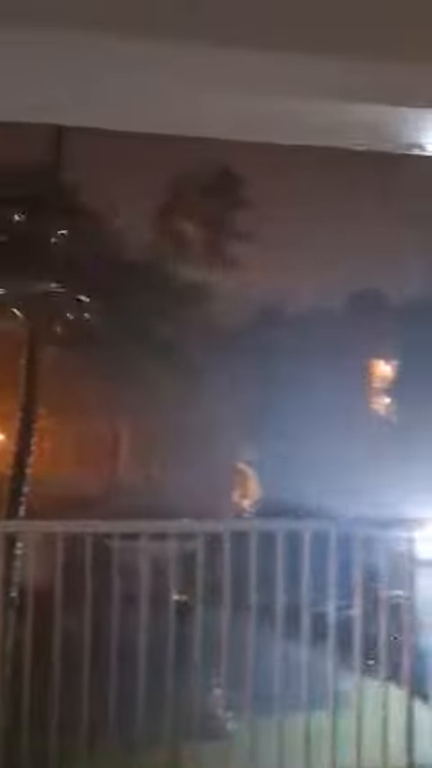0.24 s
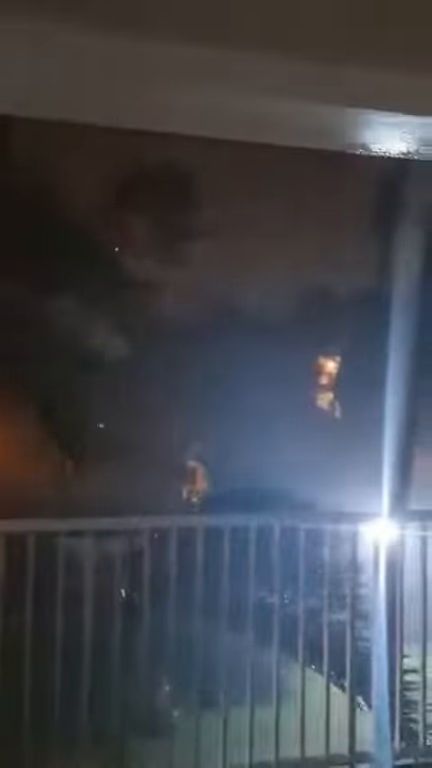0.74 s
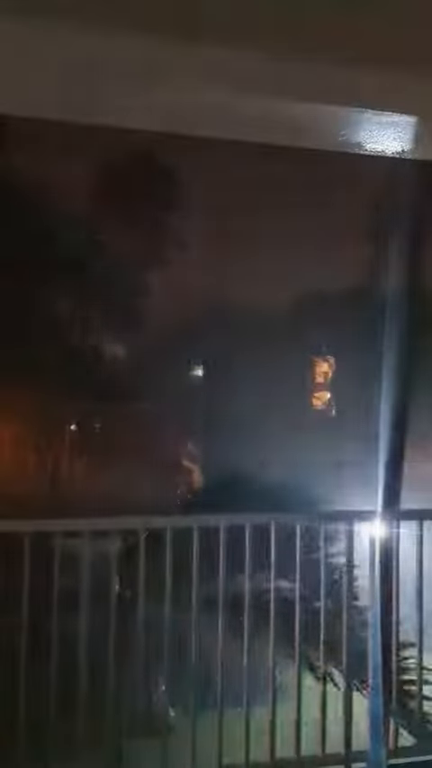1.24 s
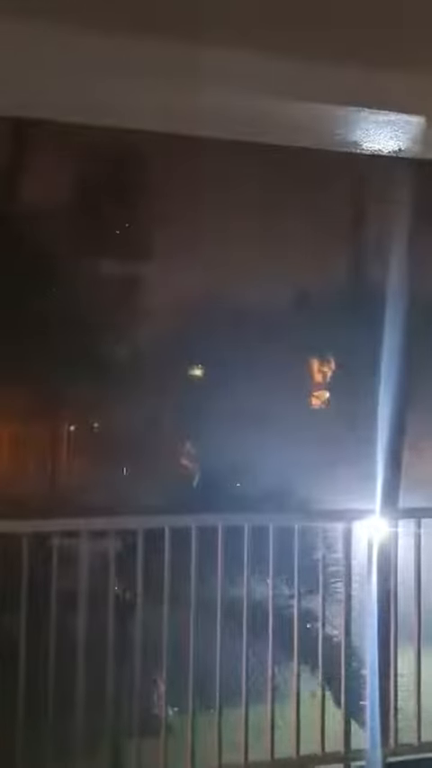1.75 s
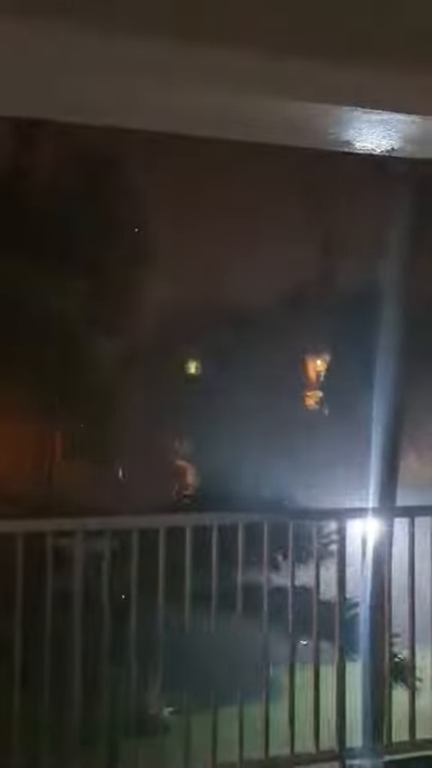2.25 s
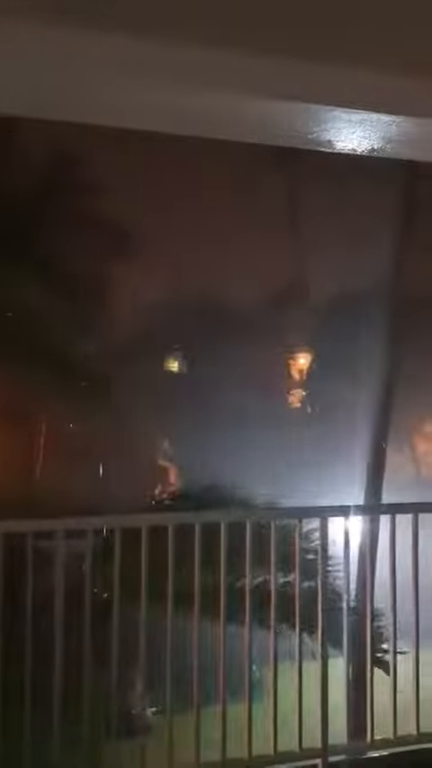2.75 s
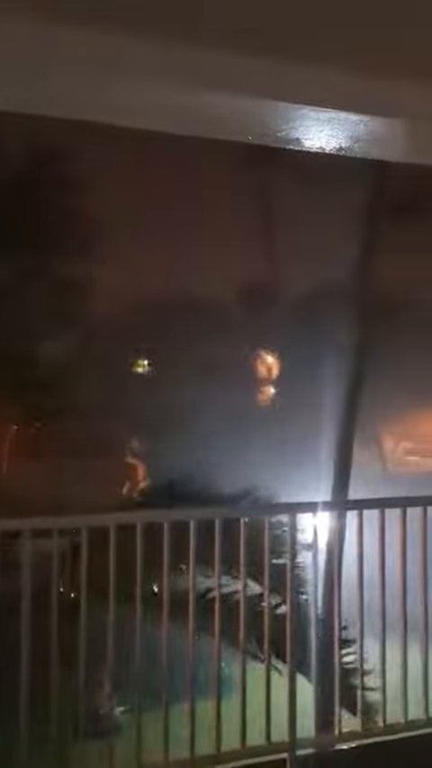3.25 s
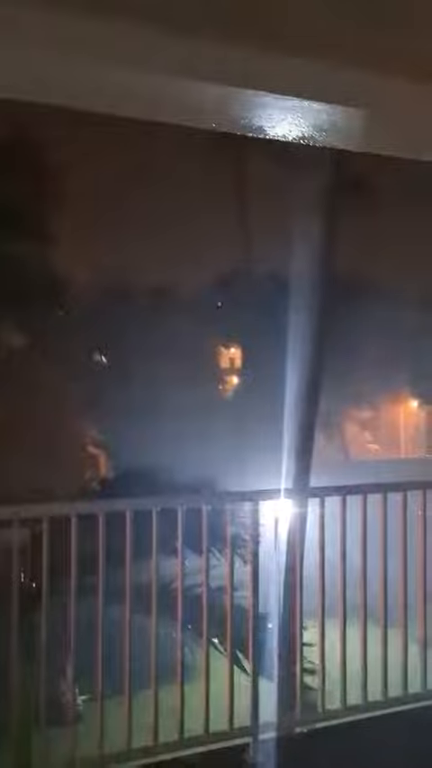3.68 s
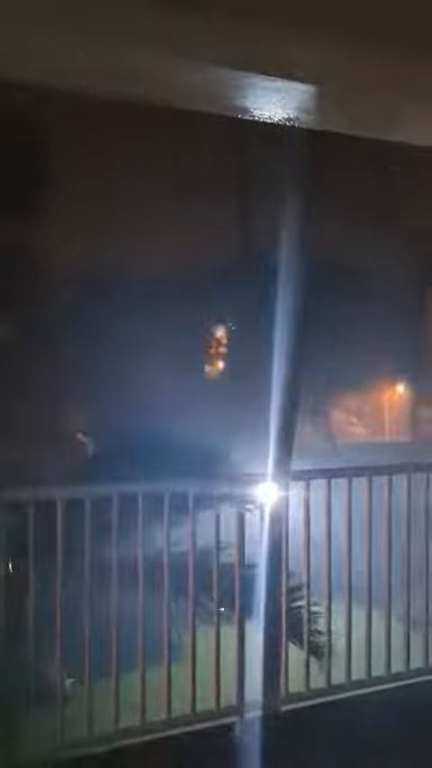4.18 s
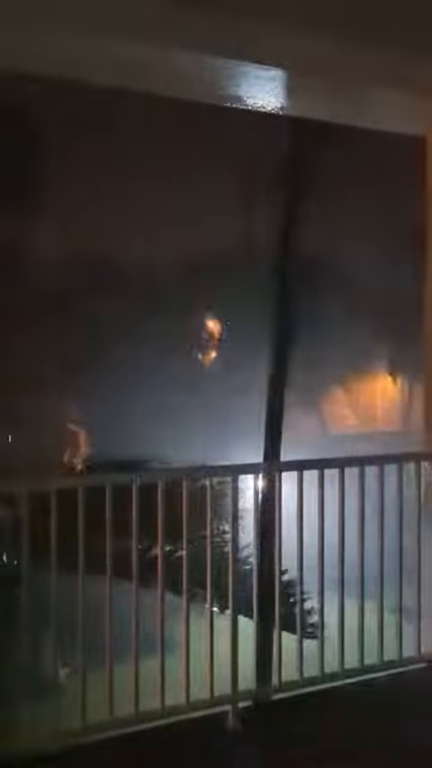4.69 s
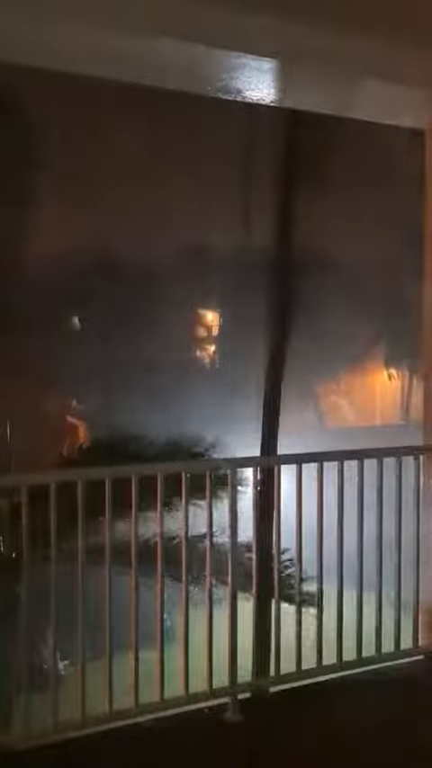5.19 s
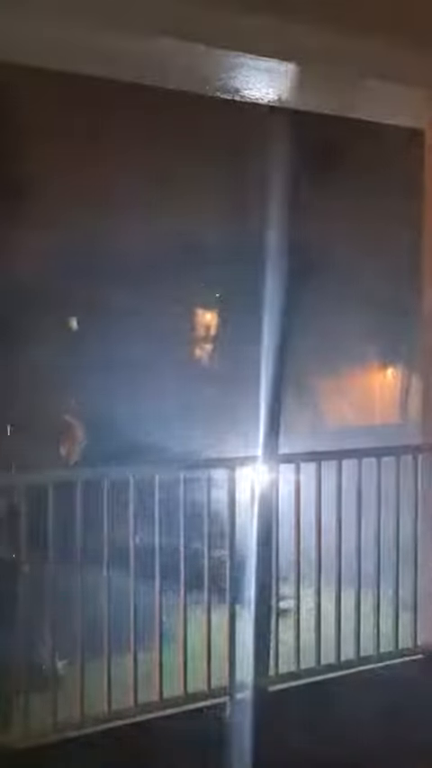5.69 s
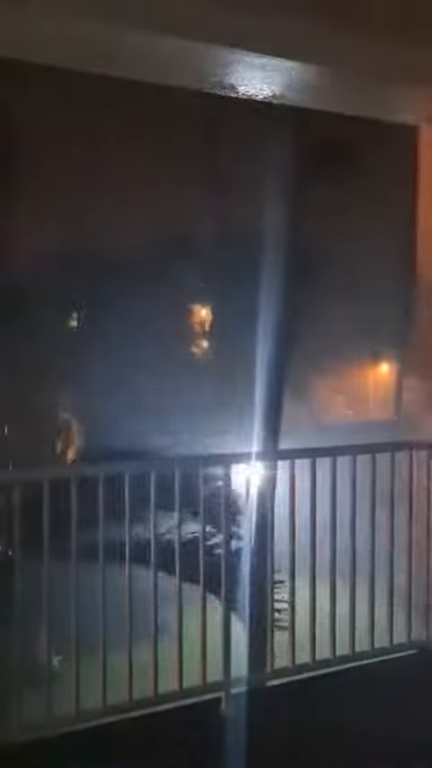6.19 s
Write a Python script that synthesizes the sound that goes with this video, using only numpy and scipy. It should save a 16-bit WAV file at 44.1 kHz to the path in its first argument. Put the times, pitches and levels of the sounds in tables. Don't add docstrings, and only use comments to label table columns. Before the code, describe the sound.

Driving rain roars and hisses outside at night while gusting wind thumps, flaps and slaps hard against a hand-held phone's microphone.

```python
import sys
import numpy as np
from scipy import signal
from scipy.fft import rfft, irfft, next_fast_len
from scipy.io import wavfile
from scipy.ndimage import uniform_filter1d

SR = 44100
rng = np.random.default_rng(int(sys.argv[2]) if len(sys.argv) > 2 else 0)


def generate_wav(sig):
    pcm = np.round(np.clip(np.atleast_2d(sig).T, -1, 1) * 32767).astype(np.int16)
    wavfile.write(sys.argv[1], SR, pcm)


def attenuation_scalar(level_db):
    decades = np.asarray(level_db, float) / 20
    return 10 ** decades


N = 283563
SIZE = next_fast_len(N)
HZ = np.maximum(np.arange(SIZE // 2 + 1) * SR / SIZE, 1)
RELEASE_STRETCH = 1.13

# (time [s], level [dB], left-right difference [dB])
WIND = [(0, -30, 4), (0.2, -37, 4), (0.45, -41.5, -4), (0.85, -47.5, -11), (1.2, -39, 18),
        (1.78, -34.5, 11), (2.02, -36, 2), (2.3, -34, -12), (2.75, -23.5, -5), (3.0, -43, 13),
        (3.65, -28, -2), (4.02, -43, -6), (4.3, -31, -0.2), (4.7, -38, 4), (5.18, -27, -3), (5.36, -27, 1),
        (5.75, -24.5, -6), (6.43, -28.5, 4)]


def rms_one(x):
    return x / np.sqrt(np.mean(x ** 2) + 1e-20)


def in_time(rows):
    s, *columns = np.transpose(rows)
    return [np.interp(np.arange(N) / SR, s, column) for column in columns]


def along(points, hz):
    points_hz, values = np.array(points).T
    return np.interp(np.log(hz), np.log(points_hz), values)


def colour(points):
    return attenuation_scalar(along(points, HZ))


def drift(rate_hz):
    hold = 40
    r = np.exp(-2 * hold * np.pi * rate_hz / SR)
    coarse = rng.standard_normal(N // hold + 2002)
    slow = signal.lfilter([1], [1, -2 * r, r * r], coarse)[2000:]
    return np.interp(np.arange(N) / hold, np.arange(len(slow)), rms_one(slow))


def noise():
    return rfft(rng.standard_normal(SIZE))


def panned(pair, pan_db):
    return pair * attenuation_scalar([pan_db / 2, -pan_db / 2])


def storm(sheet_db, patch_db):
    # (time [s], rain and leaf roar [dB], howl of the wind in the trees re its mean share [dB])
    swells = [(0, -22, -1), (0.33, -22.5, 1.5), (0.63, -21.5, 0.5), (0.87, -22.5, -1), (1.1, -21.5, 0.8),
              (1.6, -20.5, -2), (1.97, -22.5, -1), (2.18, -22, 0.5), (3.0, -22.5, 0.6), (3.27, -23.5, -2),
              (3.52, -22.5, 3.4), (3.8, -22.5, -2), (4.28, -21.5, 0.4), (4.75, -23, -1.8), (5.3, -21, 3),
              (5.75, -19.5, 0.5), (5.95, -20.5, 2.3), (6.43, -20.5, 1.1)]
    # (frequency [Hz], level per Hz [dB])
    roar_mid = [(150, -2), (360, -5.5), (760, -4.5), (980, -8), (1250, -3.5), (1750, -4), (1950, -5.5),
                (3400, -5.5), (4650, -8.5), (5500, -6), (6300, -8.5), (7000, -14), (7600, -17.5),
                (8500, -22)]
    # (frequency [Hz], level per Hz [dB])
    roar_side = [(90, -39), (150, -12), (440, -2.5), (600, -2.5), (990, -2.5), (1400, 1), (2280, -5),
                 (3100, -4), (4000, -4.5), (4600, -11), (5600, -3.5), (6300, -10), (7200, -13), (8500, -22)]
    # (frequency [Hz], left-right difference [dB])
    port_shading = [(300, -0.5), (1000, -1), (1500, -3.5), (2400, 0), (3300, -2.5), (4600, -2.5),
                    (5600, -3), (6800, 1), (8000, 2), (14000, 0.5)]
    # (frequency [Hz], level re 8500 Hz [dB])
    spray_top = [(8500, 0.5), (10200, -0.5), (12000, 1.2), (13600, 0), (14400, -1), (15100, -5.5),
                 (15800, -3)]
    spray_follows = 0.52

    roar_db, howl_db = in_time(swells)
    mid = noise() * colour(roar_mid) * (HZ > 90)
    side = noise() * colour(roar_side) * attenuation_scalar(-0.5)
    shade = np.sqrt(colour(port_shading))
    pair = np.array([(mid + side) * shade, (mid - side) / shade]) * colour(spray_top)
    core = (HZ > 1100) & (HZ < 6500)
    pair = pair / np.sqrt(np.sum(np.abs(mid[core]) ** 2) * 2) * SIZE

    sheets, out = drift(6.1), 0
    for octave in np.arange(7, 14.5, .5):
        band = np.cos(np.pi * np.clip(np.log2(HZ) - octave, -.5, .5)) ** 2
        spray_db = np.clip(2 * octave - 25, 0, 1) * spray_follows * (roar_db - roar_db.mean())
        low_db = np.clip(10.5 - octave, 0, 1) * howl_db
        flicker_db = sheet_db * sheets + patch_db * np.array([drift(8.8), drift(19.0)])
        out = out + attenuation_scalar(spray_db + low_db + flicker_db) * irfft(pair * band, SIZE)[:, :N]
    return attenuation_scalar(roar_db) * out


def stream(level_db, follows):
    wind_db, pan_db = in_time(WIND)
    return panned(attenuation_scalar(level_db + follows * (wind_db - wind_db.mean())), follows * pan_db)


def bursts(steady, rows):
    power, t = steady ** 2, np.arange(N) / SR
    for s, db, pan_db, length in rows:
        start = max(int((s - 2 * length) * SR), 0)
        near = slice(start, int((s + 2 * RELEASE_STRETCH * length) * SR))
        span = np.where(t[near] > s, RELEASE_STRETCH * length, length / RELEASE_STRETCH)
        bell = np.exp(-(2 * (t[near] - s) / span) ** 2)
        power[:, near] += np.outer(panned(attenuation_scalar(db), pan_db) ** 2, bell)
    return np.sqrt(power)


def eddies(gains, points, split_hz, order, even_s, lump_db, lump_hz):
    # (frequency [Hz], likeness [-1..1])
    likeness = [(30, .68), (130, .6), (290, .03), (440, -.75), (600, -.2), (900, -.4)]
    alike = np.clip(along(likeness, HZ), -1, 1)
    mid, side = np.sqrt(1 + alike) * noise(), np.sqrt(1 - alike) * noise()
    pair = np.array([mid + side, mid - side]) * colour(points)
    share = 1 / (1 + (HZ / split_hz) ** order)
    out = 0
    for part, gain in zip((share, 1 - share), gains):
        wave = irfft(pair * part, SIZE)[:, :N]
        power = uniform_filter1d(np.sum(wave ** 2, axis=0), int(even_s * SR)) / 2
        out = out + gain * wave / np.sqrt(power)
    return out * attenuation_scalar(lump_db * np.array([drift(lump_hz), drift(lump_hz)]))


def thumps():
    # (time [s], peak level [dB], left-right difference [dB], length [s])
    thump_events = [(0.06, -28, 3.0, 0.09), (0.19, -31, -9, 0.15), (0.287, -26, 6, 0.14),
                    (0.446, -23, -4, 0.05), (1.028, -30, -6, 0.08), (1.21, -21.5, 1, 0.1),
                    (1.566, -23.5, 2.0, 0.13), (1.702, -28, -2, 0.04), (1.84, -26, -2, 0.07),
                    (2.304, -21.5, -6, 0.069), (2.368, -22, -8.0, 0.033), (2.48, -22, -6, 0.15),
                    (2.592, -21.5, -15, 0.04), (2.67, -21, -3, 0.06), (2.75, -20, -4, 0.055),
                    (2.84, -21, 8, 0.03), (3.324, -31.5, -5, 0.12), (3.497, -27, 4, 0.13),
                    (3.64, -27, 9, 0.059), (4.287, -19, -0.0, 0.084), (4.51, -25, 6, 0.034),
                    (4.948, -22, -4, 0.079), (5.107, -21.5, -6, 0.047), (5.355, -18.5, 6, 0.15),
                    (5.41, -24, 10.0, 0.04), (5.584, -24, 0.0, 0.054), (5.71, -28, -13, 0.05),
                    (5.822, -23, 0.0, 0.077), (5.93, -26.4, -4, 0.063), (6.297, -24, -3, 0.22)]
    # (frequency [Hz], level per Hz [dB])
    thump_spectrum = [(15, -24), (28, 0.5), (50, -6), (76, -2), (100, -11), (140, -16.5), (220, -22.5),
                      (500, -52)]
    wind_db, pan_db = in_time(WIND)
    upper = bursts(stream(level_db=-34.5, follows=.6), thump_events)
    deepest = panned(attenuation_scalar(wind_db), pan_db)
    return eddies((upper, deepest), thump_spectrum, split_hz=65, order=-6, even_s=0.067,
                  lump_db=2.0, lump_hz=8.7)


def flaps():
    # (time [s], peak level [dB], left-right difference [dB], bright part re peak [dB])
    flap_events = [(0.03, -27.5, 4.0, 5.5), (0.2, -42, -1.0, 5), (0.31, -20, 0, -1), (0.48, -29, 4, 5),
                   (0.69, -34, -2, -1), (0.95, -34, -11, -11), (1.14, -28.5, -3, 4), (1.19, -25, -4, -7),
                   (1.52, -38, 7, 8), (2.23, -19.5, -4, -8), (2.31, -24, -13, -18), (2.52, -31.5, -5, 10.5),
                   (2.79, -23, -2, -7), (2.86, -26, -3, -21), (2.99, -23.8, -3, -11), (3.17, -29, -1, -2),
                   (3.5, -28, 1, -7), (3.7, -19.5, 3.5, -12), (3.91, -33.5, -12, -5), (4.28, -28, 11, -6),
                   (4.51, -43, 8, -7), (4.88, -25.5, -1, 2.5), (4.97, -25.5, 0, 2), (5.05, -21, -4, -6),
                   (5.33, -39, -1, 2), (5.58, -24, 6, -13), (5.77, -37, -12, -8), (6.06, -30, 8, -9),
                   (6.16, -28, -1, 3), (6.4, -24.5, -5, -5)]
    # (frequency [Hz], level per Hz [dB])
    flap_spectrum = [(70, -45), (130, -2), (220, -4.5), (370, -2.5), (480, -18), (680, -16.5), (850, -19.5),
                     (1200, -49)]
    length_s, follows = 0.067, .45
    dull_rows = [(s, db, pan, length_s) for s, db, pan, _ in flap_events]
    bright_rows = [(s, db + re, pan, length_s) for s, db, pan, re in flap_events]
    dull = bursts(stream(-33.5, follows), dull_rows)
    bright = bursts(stream(-36, follows), bright_rows)
    return eddies((dull, bright), flap_spectrum, split_hz=490, order=6, even_s=0.027,
                  lump_db=2.0, lump_hz=30.0)


def slaps(cycles):
    # (time [s], left peak level [dB], right peak level [dB], pitch [Hz])
    slap_events = [(.024, -4, -14, 520), (.037, -2, -13, 600), (.04, -6, -16, 450), (.19, -14, -8, 420),
                   (.205, -9, -16, 400), (.214, -16, -8, 430), (.295, -14, -7, 480), (.301, -14, -5, 520),
                   (.305, -1.5, -12, 520), (.315, -16, -8, 420), (.329, -5, -10, 330), (.35, -9, -6, 350),
                   (.45, -10, -16, 350), (.487, -14, -9, 300), (.585, -9, -18, 700), (1.195, -13, -13, 300),
                   (2.29, -18, -8, 420), (2.307, -14, -3, 380), (2.79, -16, -10, 250),
                   (3.49, -11, -18, 220), (5.33, -9, -16, 260), (.078, -11, -13, 300),
                   (.273, -12, -13, 280), (2.66, -20, -13, 200)]
    out, t = np.zeros((2, N)), np.arange(N) / SR
    signs = rng.choice([-1, 1], (len(slap_events), 2))
    for (s, left_db, right_db, hz), sign in zip(slap_events, signs):
        near = slice(int((s - .01) * SR), int((s + .01) * SR))
        turns = (t[near] - s) * hz
        wave = np.exp(-(turns / cycles) ** 2) * np.cos(2 * np.pi * turns)
        out[:, near] += np.outer(sign * attenuation_scalar([left_db, right_db]), wave)
    return out


def drops():
    per_s, level_db = 80, -28
    hits = rng.exponential(1, N)
    sizes = attenuation_scalar(level_db + 4 * np.minimum(hits, 3)) * (rng.random(N) < per_s / SR)
    ticks = sizes * rng.uniform(-1, 1, (2, N))
    dealt, out = rng.integers(0, 4, N), 0
    for k, hz in enumerate(np.geomspace(1800, 5200, num=4)):
        r, w = attenuation_scalar(-10 * hz / SR), 2 * np.pi * hz / SR
        ring = [0, np.sin(w)], [1, -2 * r * np.cos(w), r * r]
        out = out + signal.lfilter(*ring, ticks * (dealt == k) + 1e-18)
    return out


def scene():
    rain = storm(sheet_db=0.27, patch_db=0.2)
    wind = attenuation_scalar(-1.4) * thumps() + attenuation_scalar(-2.0) * flaps() + slaps(cycles=0.51)
    return rain + wind + drops()


def during(spans, s):
    return np.any([(s >= start) & (s <= end) for start, end in spans], axis=0)


def spectral_gate(x, dropped_db):
    # (frequency [Hz], level [dB])
    threshold = [(400, -9), (1000, -5), (1400, -3.1), (3000, -2.4), (5000, -2.2), (6300, -1.8), (6800, -.3),
                 (7600, -.3), (8600, -3.2), (10000, -3), (12000, -4), (14000, -3), (15000, -1.5)]
    # (start [s], end [s])
    notch_spans = [(.04, .08), (.18, .24), (.45, .54), (.63, 1.0), (1.03, 1.11), (1.16, 1.35), (1.42, 1.46),
                   (1.64, 1.82), (1.95, 2.03), (2.15, 2.19), (2.41, 2.56), (2.63, 2.66), (2.7, 2.73),
                   (2.88, 2.92), (3.02, 3.05), (3.13, 3.26), (3.3, 3.61), (3.7, 4.24), (4.45, 4.54),
                   (4.63, 4.68), (4.92, 5.28), (5.47, 5.61), (5.75, 5.96), (6.25, 6.3), (6.38, 6.43)]
    # (start [s], end [s])
    top_spans = [(0, .01), (.28, .31), (.56, .61), (1.83, 1.88), (2.37, 2.4), (3.64, 3.67), (4.29, 4.32),
                 (4.69, 4.72), (4.9, 4.92), (5.35, 5.45), (5.64, 5.76), (5.96, 6.01), (6.08, 6.11)]
    frame = dict(nperseg=2048, noverlap=1536)
    hz, s, bins = signal.stft([x[0] + x[1], x[0] - x[1]], SR, **frame)
    power = np.abs(bins) ** 2 + 1e-20
    streak = uniform_filter1d(uniform_filter1d(power, size=3, axis=1), size=5, axis=2)
    around = uniform_filter1d(uniform_filter1d(power, size=21, axis=1), size=21, axis=2)
    margin_db = 10 * np.log10(streak / around) - along(threshold, hz + 1)[:, None]
    kept = np.clip(margin_db + .5, 0, 1)
    notch = (hz > 7620) & (hz < 8270)
    kept[0] *= ~(notch[:, None] & during(notch_spans, s))
    shut_top = (hz > 15160)[:, None] & ~during(top_spans, s)
    gain = attenuation_scalar(dropped_db * (1 - kept)) * ~shut_top
    mid, side = signal.istft(bins * gain, SR, **frame)[1][:, :N] / 2
    return np.array([mid + side, mid - side])


def band_limit(x):
    return signal.sosfilt(signal.butter(12, 15730, fs=SR, output="sos"), x)


def record(dry):
    rounded = 2 * np.tanh(dry / 2)
    gated = spectral_gate(rounded, dropped_db=-25)
    return band_limit(np.clip(gated, -1, 1))


dry = scene()
out = record(dry)
generate_wav(out)
```